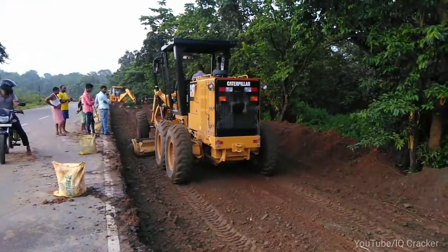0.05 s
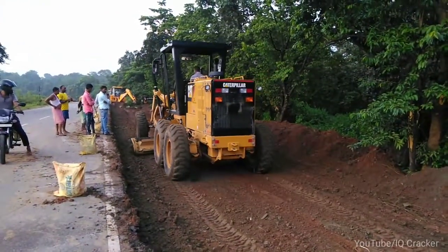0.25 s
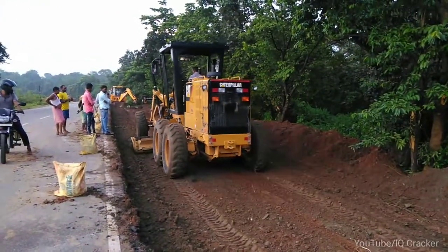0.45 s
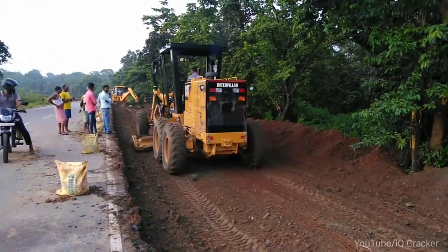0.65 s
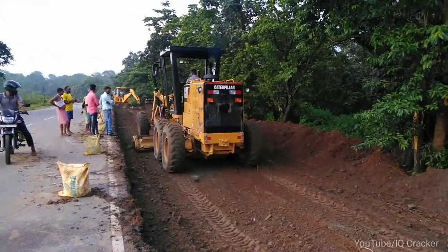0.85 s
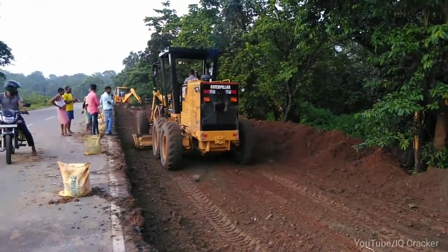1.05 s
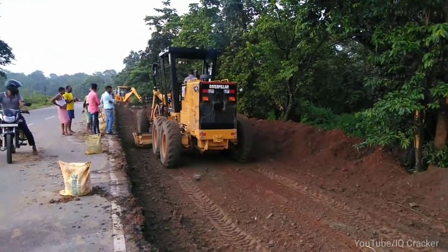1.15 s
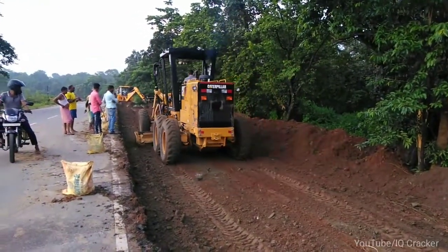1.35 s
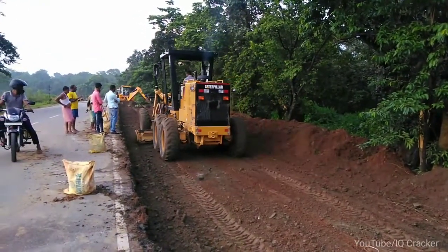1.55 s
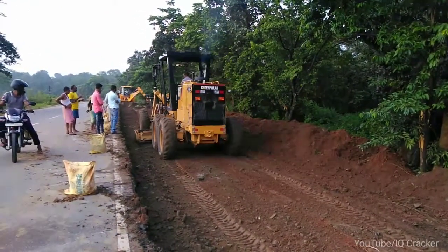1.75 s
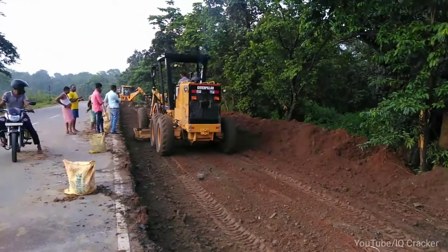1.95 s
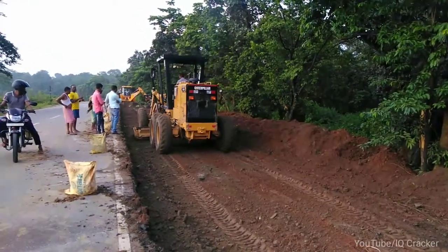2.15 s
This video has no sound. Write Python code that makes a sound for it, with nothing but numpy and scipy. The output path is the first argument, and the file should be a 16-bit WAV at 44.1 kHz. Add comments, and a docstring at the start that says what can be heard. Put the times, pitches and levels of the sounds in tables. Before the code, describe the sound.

A motor grader's diesel engine surges under load with throbbing, rasping exhaust, revs up, then eases off

```python
"""A motor grader pulls away under load beside a road; its diesel nearly holds its speed, then revs up.
Each firing pushes a deep throb and a puff of hissing gas out of the exhaust stack, which rings in its pipe modes.
The throb is a tone at the firing rate over a rumble; rasp and hiss are noise let out puff by puff.
When the load comes off, throb and hiss die back into the steady clatter of the machine, which is rough noise."""
import sys
import numpy as np
from scipy import signal
from scipy.fft import rfft, irfft
from scipy.io import wavfile

SR = 44100
rng = np.random.default_rng(int(sys.argv[2]) if len(sys.argv) > 2 else 0)


def wav_record(signal):
    """Record a signal, one row per channel, as 16-bit PCM in the file named by sys.argv[1]."""
    frames = np.transpose(np.atleast_2d(signal))
    bounded = np.clip(frames, -1, 1)
    # unit amplitude maps onto the largest positive 16-bit level
    quanta = np.round(bounded * 32767).astype(np.int16)
    wavfile.write(sys.argv[1], SR, quanta)


N = 97020
T = np.arange(N) / SR  # seconds
HZ = np.maximum(np.arange(N // 2 + 1) * SR / N, 1)  # frequency of each spectral bin


# Fader of the exhaust throb, before its trim. Each row: time in seconds, level in dB.
THROB_LEVEL = [(0, -67), (.09, -55), (.14, -34), (.19, -37.5), (.23, -27), (.45, -23.5), (.51, -23.5),
               (.57, -18.5), (.76, -17), (1.08, -17), (1.22, -15.5), (1.35, -22), (1.4, -18), (1.56, -18.5),
               (1.61, -26), (1.67, -20), (1.76, -26), (1.81, -19), (1.85, -25.5), (1.91, -22.5),
               (1.945, -39), (1.99, -30.5), (2.06, -43.5), (2.2, -58.5)]
# Overtones of the throb. Each row: multiple of the firing rate, level in dB against the firing tone.
OVERTONES = [(2, -19.5), (3, -39)]
# Colour of the turbulent rumble of the gas. Each row: frequency in Hz, relative density in dB per Hz.
RUMBLE = [(15, -32), (30, -19), (50, -12.5), (90, 5.5), (115, -4.5), (150, -1), (190, -22), (300, -16),
          (450, -28.5), (900, -50)]
THROB_TRIM_DB, THROB_UNEVEN_DB = -0.5, .75
HUM_DB = -41.5  # the firing tone that remains off load, at top engine speed
SHUDDER_BEAT_HZ, SHUDDER_DB = 99.3, -18.5  # level against the throb fader
RUMBLE_DB, RUMBLE_DB_PER_HZ = -22.5, 0.2056  # the rumble grows with engine speed
RUMBLE_FOLLOWS = .75  # dB of rumble per dB of throb


def exhaust_throb(turns, revved_hz):
    """Gas pulses sound the firing tone with weak overtones, a low shudder and turbulent rumble."""
    level_db = in_time(THROB_LEVEL)
    tone = np.cos(2 * np.pi * turns)
    for multiple, db in OVERTONES:
        tone = tone + from_db(db) * np.cos(2 * np.pi * multiple * turns)
    loaded = from_db(level_db + THROB_TRIM_DB + THROB_UNEVEN_DB * drift(48))
    hum = from_db(HUM_DB) * revved_hz / revved_hz.max()
    tone = np.sqrt(2) * tone * np.hypot(loaded, hum)

    # the firing beats with a steady rate, so the shudder sinks in pitch as the engine revs
    shudder = np.sin(2 * np.pi * (SHUDDER_BEAT_HZ * T - turns))
    shudder = np.sqrt(2) * from_db(level_db + SHUDDER_DB) * shudder

    rumble_db = RUMBLE_DB + RUMBLE_FOLLOWS * level_db + RUMBLE_DB_PER_HZ * revved_hz
    return np.outer([1, 0], tone + shudder) + noise(RUMBLE) * from_db(rumble_db)


def exhaust_hiss(turns, revved_hz):
    """Puffs of gas rasp and hiss in the stack; some spit, crack or make a pipe mode sing."""
    hiss_flow = puffs(turns, revved_hz, HISS_LEAK, HISS_FALL)
    rasp_flow = puffs(turns, revved_hz, RASP_LEAK, RASP_FALL)
    hard_rasp_db, hard_hiss_db = hard_firings()
    treble = hiss(hiss_flow, hard_hiss_db) + spits(hiss_flow) + cracks()
    return rasp(rasp_flow, hard_rasp_db) + cut_on(treble) + pipe_song(hiss_flow)


# Steady flow between puffs, as a share.
RASP_LEAK, HISS_LEAK = .23, .14
MERGE_HZ = 33  # a rise in firing rate that would merge the puffs into a steady jet
PUFF_RISE, HISS_FALL, RASP_FALL = 0.2, 0.2, 0.45  # shape of a puff, in firing cycles
PUFF_DELAY, PUFF_ADVANCE_PER_HZ = 0.046, 0.0098  # cycles behind the throb; earlier with engine speed
PUFF_UNEVEN_DB = .4
GRAIN_DB, GRAIN_PER_S = .8, 700  # fine roughness of the flow


def puffs(turns, revved_hz, leak, fall):
    """Gas flow: one puff a firing, quick to rise and with a longer tail, each of its own strength, over a leak."""
    late = turns - PUFF_DELAY + PUFF_ADVANCE_PER_HZ * revved_hz
    strengths = from_db(PUFF_UNEVEN_DB * rng.standard_normal(N))
    bursts = 0
    # the nearest puff and the tail of the one before it
    for firing in (np.round(late), np.round(late) - 1):
        age = late - firing
        rise = (np.minimum(age, 0) / PUFF_RISE) ** 2
        tail = np.maximum(age, 0) / fall
        bursts = bursts + strengths[firing.astype(int)] * np.exp(-rise - tail)
    leak = np.clip(leak + (revved_hz / MERGE_HZ) ** 2, 0, 1)
    flow = leak + (1 - leak) * bursts
    return rms_one(flow * from_db(GRAIN_DB * drift(GRAIN_PER_S)))


# Single hard firings that knock. Each row: time in seconds, change of rasp in dB, change of hiss in dB.
HARD_FIRINGS = [(0.353, -1, 1), (.456, 0, 7.5), (.589, 1.5, 4), (.654, 4, 2), (0.752, 5.5, 0.5),
                (.72, 0, 2), (1.0, 2.5, 1.5), (1.046, 1, 1.5), (1.233, 3.5, 0), (1.315, 5.5, 2),
                (1.508, 3.5, 0), (1.819, 1.5, -2)]
HARD_FIRING_S = .006  # time to either side in which the accent fades


def hard_firings():
    """A harder firing shifts rasp and hiss for a moment: both changes over time, in dB."""
    change_db = 0
    for time, rasp_db, hiss_db in HARD_FIRINGS:
        accent = np.exp(-((T - time) / HARD_FIRING_S) ** 2)
        change_db = change_db + np.outer([rasp_db, hiss_db], accent)
    return change_db


# Fader of the rasp, before the hard firings. Each row: time in seconds, level in dB.
RASP_LEVEL = [(0, -47), (.2, -46.5), (.27, -40.5), (.45, -38), (.56, -36), (.59, -30), (.68, -32),
              (.76, -30), (1.0, -29.5), (1.2, -32), (1.24, -26.5), (1.35, -29), (1.46, -29.5), (1.7, -29),
              (1.88, -31.5), (1.98, -47), (2.2, -39.5)]
# Broad colour of the rasp. Each row: frequency in Hz, relative density in dB per Hz.
RASP = [(500, -33), (900, -19), (1130, 0), (1500, -3.5), (2050, 2.5), (2600, 1.5), (2950, -3), (3500, 5.5),
        (3750, -4.5), (4050, 0.5), (4800, -2.5), (6500, 3), (12000, -42)]
# Pipe modes in the rasp. Each row: frequency in Hz, width in Hz, level in dB against the broad colour.
RASP_MODES = [(1464, 50, -6.5), (1767, 137, 6.5), (2350, 97, -1), (2655, 33, 12), (3144, 78, 7.5),
              (3965, 140, 0.5)]
RASP_PATCHY_DB = 3.3  # how far the colour of the jet shifts


def rasp(flow, hard_db):
    """Jet noise in the middle range, pulsed by the puffs and ringing in the pipe."""
    jet = patchy(noise(RASP), RASP_PATCHY_DB) * flow
    return stack(jet, RASP_MODES) * from_db(in_time(RASP_LEVEL) + hard_db)


# Fader of the hiss, before hard firings and the cut-on. Each row: time in seconds, level in dB.
HISS_LEVEL = [(0, -100), (.2, -57), (.28, -40.5), (.42, -43), (.49, -34.5), (.52, -23.5), (.545, -26),
              (.6, -25.5), (.78, -22), (.91, -19.5), (1.04, -24.5), (1.2, -21.5), (1.3, -25.5), (1.32, -24),
              (1.37, -24.5), (1.43, -21), (1.72, -22.5), (1.88, -29.5), (1.96, -34), (2.03, -45.5),
              (2.2, -47)]
# Broad colour of the hiss. Each row: frequency in Hz, relative density in dB per Hz.
HISS = [(3500, -33), (4850, -1), (5080, 2), (6500, 2.5), (7000, -1), (7600, -1), (8400, -4.5), (9300, 2),
        (9600, -8), (11500, -9.5), (13000, -23), (15500, -52)]
# Pipe modes in the hiss. Each row: frequency in Hz, width in Hz, level in dB against the broad colour.
HISS_MODES = [(5080, 94, -1.5), (5520, 83, -4), (5670, 100, -14), (6360, 160, -11)]
HISS_PATCHY_DB = 1.2


def hiss(flow, hard_db):
    """Treble jet noise, pulsed by the puffs and ringing in the pipe."""
    jet = patchy(noise(HISS), HISS_PATCHY_DB) * flow
    return stack(jet, HISS_MODES) * from_db(in_time(HISS_LEVEL) + hard_db)


# Colour of spits and cracks. Each row: frequency in Hz, relative density in dB per Hz.
SPIT = [(1000, -15.5), (3000, -1), (6000, -8), (9000, -1.5), (10800, 4), (12500, -6), (15000, -5)]
# Harder blasts of gas. Each row: start in seconds, length in seconds, level in dB before the trim, upper edge in Hz.
SPITS = [(.745, .075, -27, 15000), (.82, .09, -35, 14000), (.91, .097, -22, 14500),
         (1.44, .065, -25, 12000), (1.51, .14, -33, 10000)]
SPIT_TRIM_DB, SPIT_FADE_S = 1.5, .012


def spits(flow):
    """Harder blasts of gas add a brighter spit to the puffs, each with its own upper edge."""
    bright = rfft(noise(SPIT) * flow)
    out = 0
    for start, length, db, top_hz in SPITS:
        blast = irfft(bright / (1 + (HZ / top_hz) ** 20), N)
        out = out + blast * from_db(db + SPIT_TRIM_DB) * swell(start, start + length, SPIT_FADE_S)
    return out


# Sharp cracks in the hardest puffs. Each row: time in seconds, level in dB before the cut-on.
CRACKS = [(.589, -24), (.999, -14)]
CRACK_S = 0.00085  # decay time


def cracks():
    """Bright noise that starts at once and dies away within a few milliseconds."""
    level = 0
    for time, db in CRACKS:
        level = level + from_db(db) * (T >= time) * np.exp(-np.abs(T - time) / CRACK_S)
    return noise(SPIT) * level


# Pipe modes that briefly sing out. Each row: start in seconds, end in seconds, frequency in Hz, width in Hz,
# level in dB.
SINGS = [(1.247, 1.295, 1260, 100, -36), (1.384, 1.503, 1384, 29.8, -37), (1.387, 1.6, 5540, 203.7, -27)]
SING_FADE_S = 0.014


def pipe_song(flow):
    """Single modes of the stack, driven by the jet, whistle briefly as the engine revs up."""
    jet = rfft(rng.standard_normal((2, N)) * flow)
    out = 0
    for start, end, hz, width, db in SINGS:
        shape = swell(start, end, SING_FADE_S)
        whistle = rms_one(irfft(jet * resonance(hz, width), N) * shape)
        # the level holds while the mode sings, however short that is
        out = out + whistle * np.sqrt(np.mean(shape ** 2)) * from_db(db)
    return out


def stack(x, modes):
    """The pipe passes the sound and rings on after it in its modes."""
    response = 1
    for hz, width, db in modes:
        response = response + from_db(db) * resonance(hz, width)
    return rms_one(irfft(rfft(x) * response, N))


CUT_ON_HZ = 5020  # first cross mode of the pipe
CUT_ON_DB = -6.5  # the pipe passes this much less below it


def cut_on(x):
    """Treble travels freely along the pipe only above its first cross mode."""
    above = .5 + .5 * np.tanh((HZ - CUT_ON_HZ) / 30)
    return irfft(rfft(x) * from_db(CUT_ON_DB * (1 - above)), N)


# Colour of engine, fan and drive. Each row: frequency in Hz, relative density in dB per Hz.
CLATTER = [(20, -14), (50, 1), (85, 3.5), (125, 12.5), (200, 7), (300, 9), (390, -1.5), (600, 1), (790, 2),
           (930, -5.5), (1250, -1.5), (2400, 1), (2950, -4.5), (4200, -4), (6500, -14.5), (8000, -11.5),
           (11000, -5.5), (13000, -14), (15000, -25)]
# Fader of the clatter, before its roughness. Each row: time in seconds, level in dB.
CLATTER_LEVEL = [(0, -41), (.2, -41), (.6, -38), (1.2, -40), (1.85, -35.5), (2.03, -36), (2.2, -36.5)]
CLATTER_ROUGH_DB, CLATTER_PATCHY_DB = 1.4, 1.76
KNOCK_S, KNOCK_HZ, KNOCK_DECAY_S, KNOCK_DB = 0.085, 820, 0.0078, -32.5


def machine():
    """Rough mechanical clatter as uneven noise, and one small knock as a decaying sine."""
    level_db = in_time(CLATTER_LEVEL) + CLATTER_ROUGH_DB * drift(100)
    clatter = patchy(noise(CLATTER), CLATTER_PATCHY_DB) * from_db(level_db)
    age = np.maximum(T - KNOCK_S, 0)
    knock = from_db(KNOCK_DB) * np.sin(2 * np.pi * KNOCK_HZ * age) * np.exp(-age / KNOCK_DECAY_S)
    return clatter + np.outer([1, 0], knock)


# Left port against the right. Each row: frequency in Hz, level in dB, lag in ms, likeness from 0 to 1.
PORTS = [(25, -0.5, 3, 0.5), (58.4, 5.5, 2.33, 0.89), (148, -.5, .5, 0.97), (274, 2, 0.37, 0.97),
         (663, -1, 0.19, 0.88), (1270, 1.5, 0.12, 0.65), (1410, 3.5, 0.19, 0.67), (1551, -1, 0.33, 0.94),
         (1804, -5.5, 0.16, 0.65), (1983, -1, 0.265, 0.88), (2390, -4, 0.11, 0.8), (2670, -1, 0.16, 1),
         (2830, -.5, 0.17, 0.88), (2970, 0, 0.166, 0.93), (3560, -4, 0.18, 0.72), (3900, -1, .17, 0.68),
         (4400, 1, 0.2, 1), (4640, -1, 0.19, 0.72), (5330, -4, 0.18, 0.77), (5520, -2.5, 0.22, 1),
         (6400, -12, 0.22, 0.74), (7900, -18, 0.283, 0.17), (9800, -14.5, 0.186, 0.45),
         (9900, -25, 0.26, 0.2), (12600, -13, 0.237, 0.6)]


def ports(pair):
    """The right port faces the machine; the left hears it later, duller and mixed with scattered sound."""
    direct, scattered = rfft(pair)
    level_db, lag_ms, alike = over_hz(PORTS)
    alike = np.clip(alike, 0, 1)
    left = from_db(level_db) * (alike * direct + np.sqrt(1 - alike ** 2) * scattered)
    # half the lag delays the left, half advances the right
    half_lag = np.exp(-1j * np.pi * HZ * lag_ms / 1000)
    return irfft(np.array([left * half_lag, direct / half_lag]), N)


def from_db(db):
    """Decibels to gain."""
    return 10 ** (np.asarray(db) / 20)


def rms_one(x):
    """Scale to unit level."""
    return x / np.sqrt(np.mean(x ** 2) + 1e-20)


def in_time(rows):
    """Join the points of a curve by straight lines."""
    return np.interp(T, *np.transpose(rows))


def over_hz(rows):
    """Each column of a table on a log-frequency axis."""
    hz, *columns = np.transpose(rows)
    return [np.interp(np.log(HZ), np.log(hz), column) for column in columns]


def drift(rate):
    """Smooth chance with a spread of 1, softened above the rate in Hz."""
    return rms_one(irfft(rfft(rng.standard_normal(N)) / (1 + (HZ / rate) ** 2), N))


def swell(start, end, fade):
    """Rise, hold and fall; half way up at start and end."""
    return np.clip(np.minimum(T - start, end - T) / fade + .5, 0, 1)


def resonance(hz, width):
    """Response of one mode, 1 on top."""
    return 1 / (1 + 1j * (HZ / hz - hz / HZ) * hz / width)


def noise(spectrum):
    """Two unrelated noises (direct, scattered) with a broad colour."""
    colour_db = over_hz(spectrum)[0]
    return rms_one(irfft(rfft(rng.standard_normal((2, N))) * from_db(colour_db), N))


PATCHY_PER_S = 28  # rate of the colour shifts, in Hz


def patchy(x, depth_db):
    """Let every third of an octave swell and sink on its own."""
    spectrum = rfft(x)
    place = np.clip(3 * np.log2(HZ / 125), 0, 21)  # all below 125 Hz moves as one
    out = 0
    for k in range(int(place.max()) + 1):
        band = irfft(spectrum * np.maximum(1 - np.abs(place - k), 0), N)
        out = out + band * from_db(depth_db * drift(PATCHY_PER_S))
    return out


# Engine speed. Each row: time in seconds, firing rate in firings per second.
FIRING = [(0.0, 56.99), (0.5, 60.67), (1.0, 60.83), (1.15, 65.44), (1.3, 71.52), (1.6, 76.01), (1.8, 81.08),
          (2.0, 83.55), (2.2, 85.04)]
FIRST_FIRING_S = .0124


def scene():
    """Engine speed times the firings; everything comes from the one machine."""
    rate = in_time(FIRING)
    turns = np.cumsum(rate) / SR - FIRST_FIRING_S * rate[0]  # firing cycles so far
    revved_hz = np.maximum(rate - FIRING[1][1], 0)  # rise above the second point of the speed curve
    exhaust = exhaust_throb(turns, revved_hz) + exhaust_hiss(turns, revved_hz)
    return ports(exhaust + machine())


PEAK_LIMIT, CUTOFF_HZ = .8, 15300  # limit as a share of full scale


def record(dry):
    """The highest peaks are rounded; the top is cut steeply."""
    held = dry / (1 + (dry / PEAK_LIMIT) ** 6) ** (1 / 6)
    steep_cut = signal.ellip(10, .1, 80, CUTOFF_HZ, fs=SR, output="sos")
    return signal.sosfilt(steep_cut, held)


dry = scene()
out = record(dry)
wav_record(out)
```